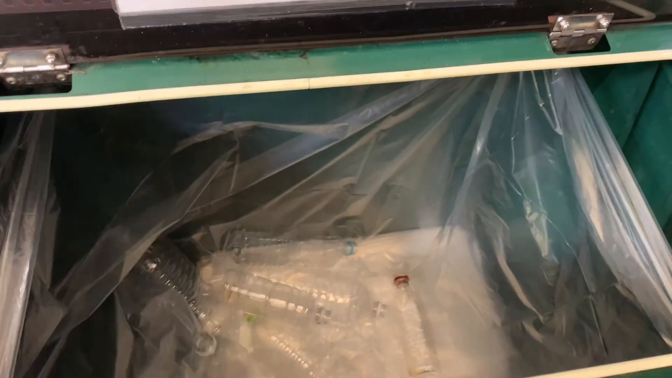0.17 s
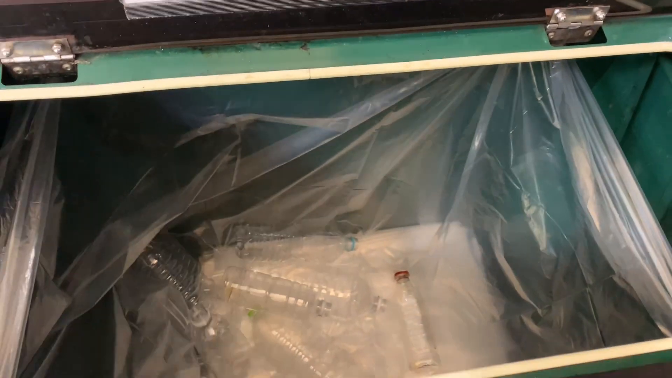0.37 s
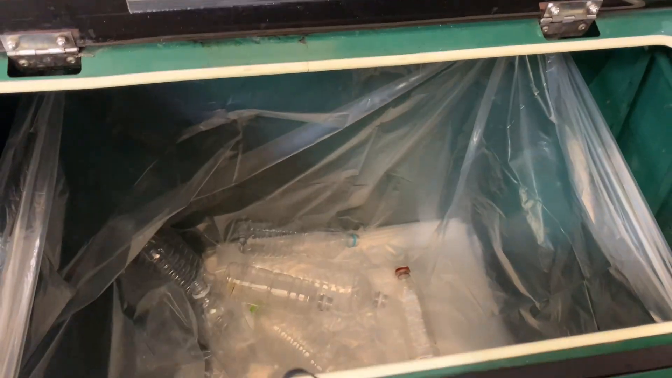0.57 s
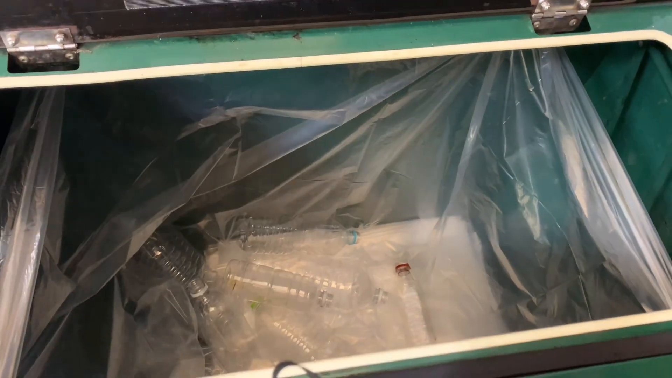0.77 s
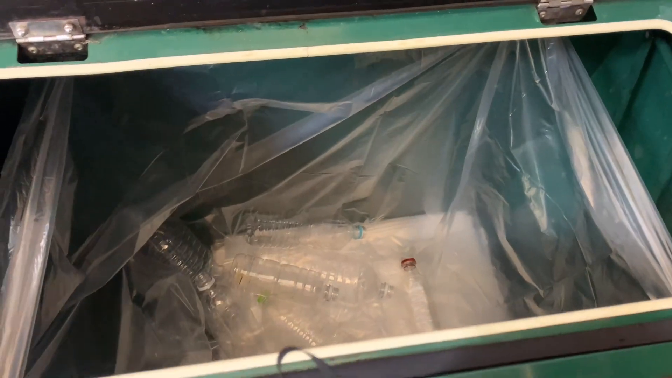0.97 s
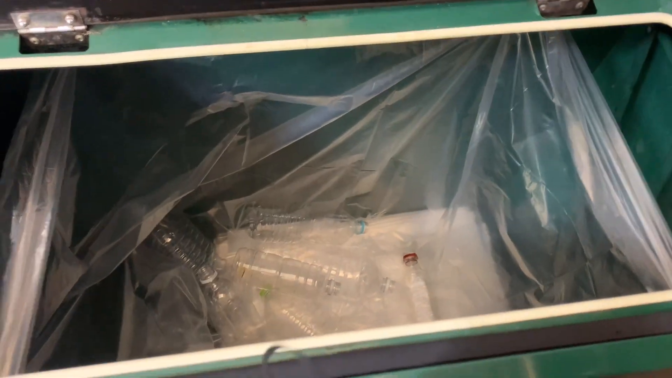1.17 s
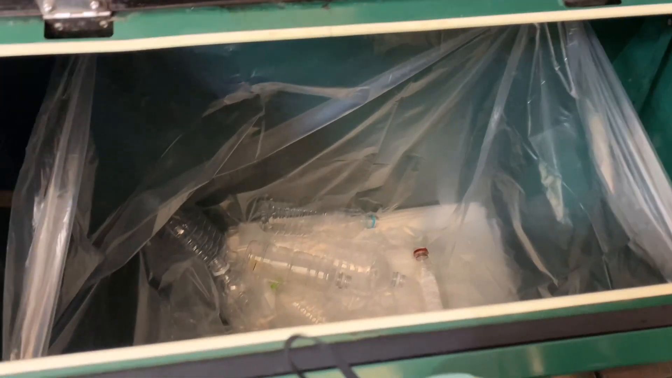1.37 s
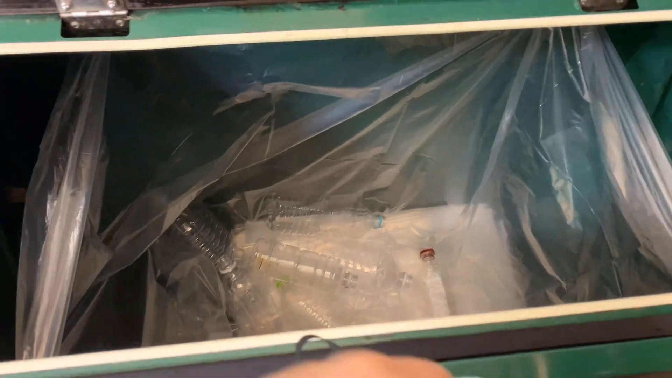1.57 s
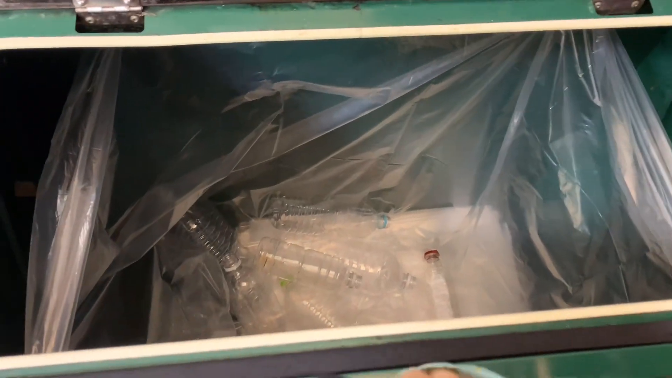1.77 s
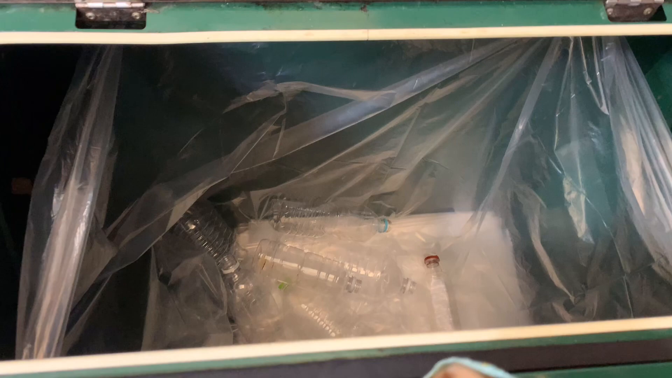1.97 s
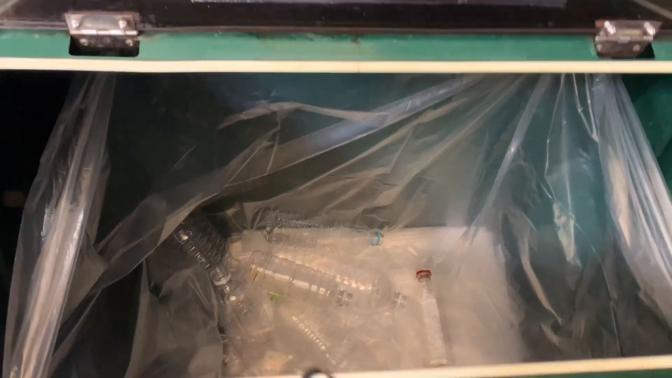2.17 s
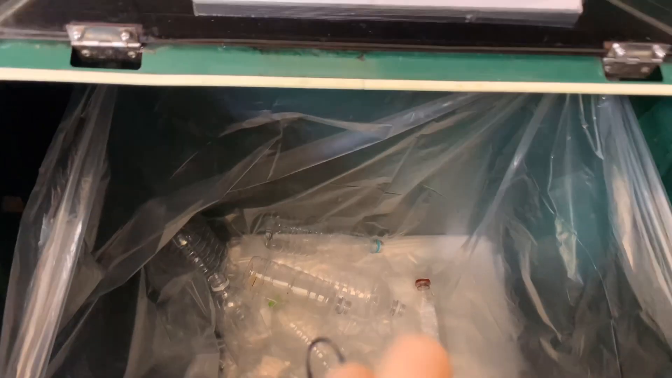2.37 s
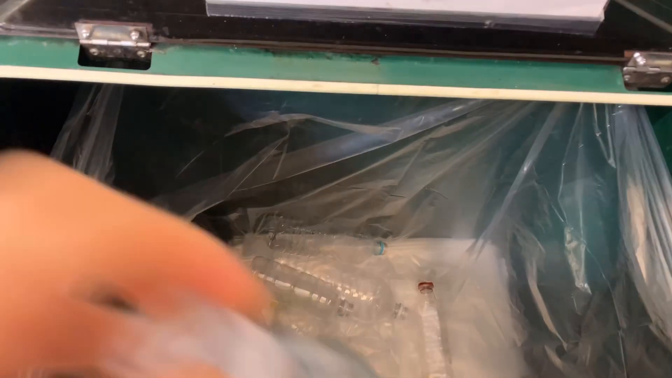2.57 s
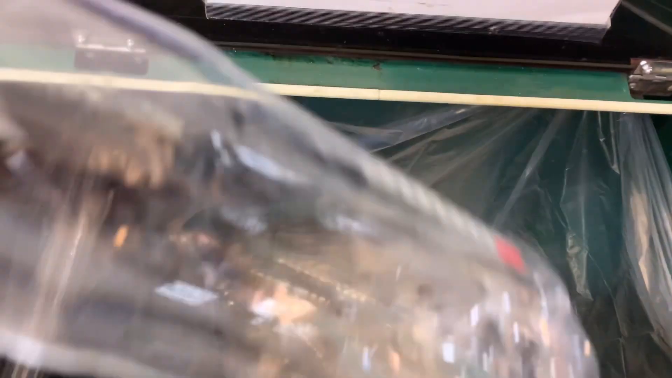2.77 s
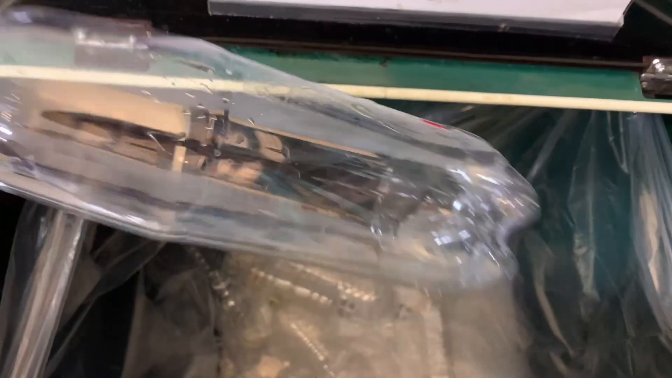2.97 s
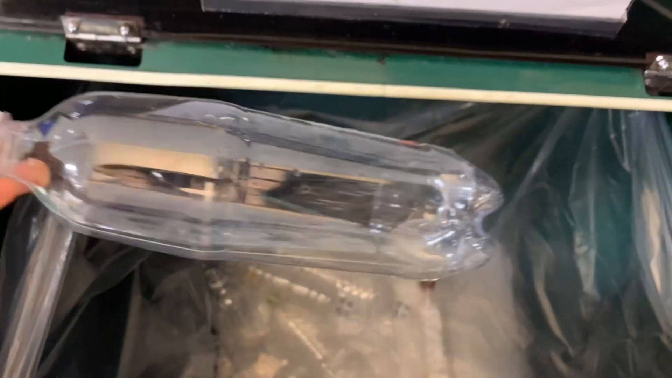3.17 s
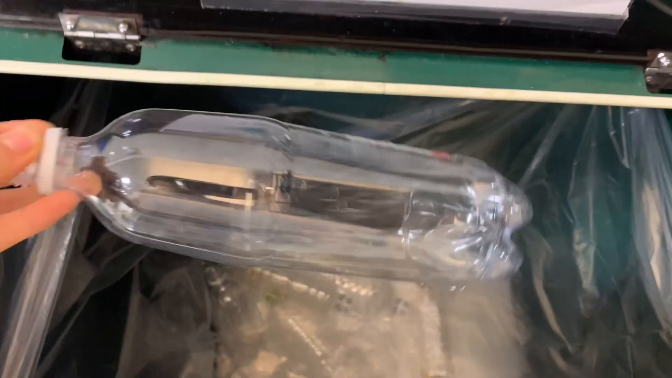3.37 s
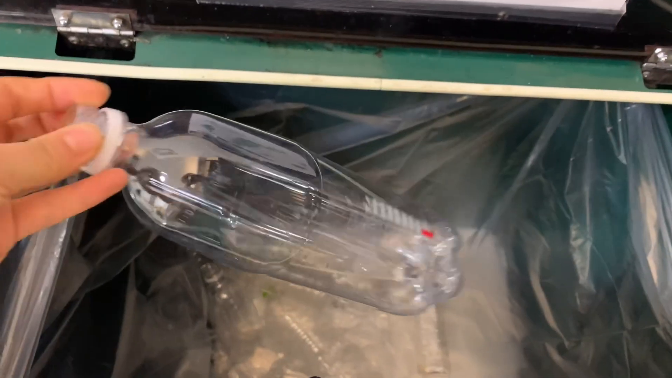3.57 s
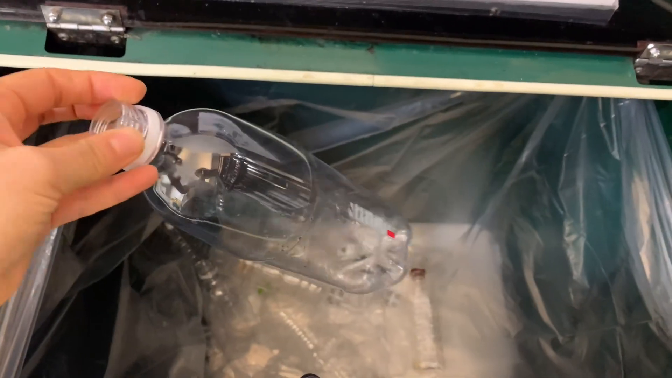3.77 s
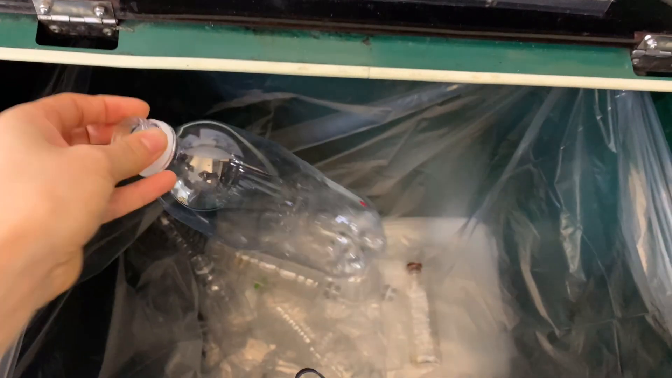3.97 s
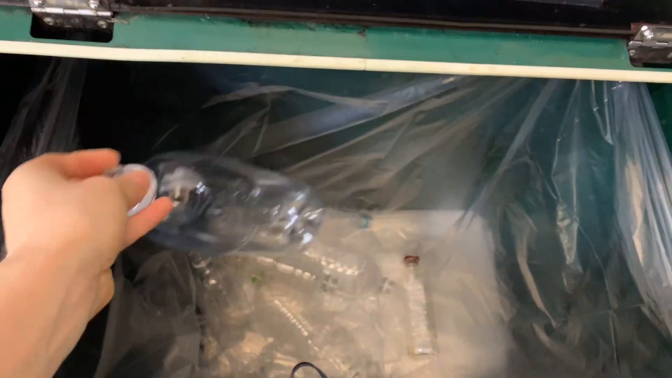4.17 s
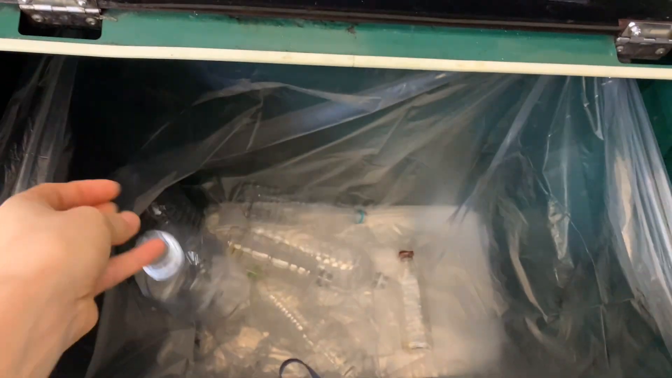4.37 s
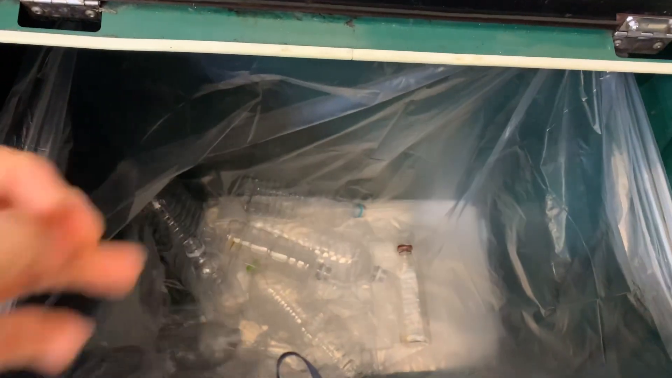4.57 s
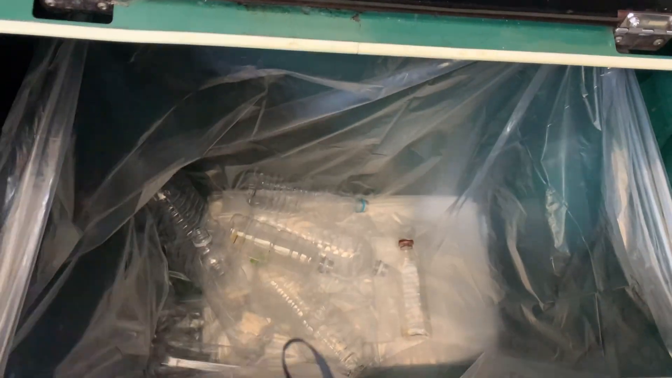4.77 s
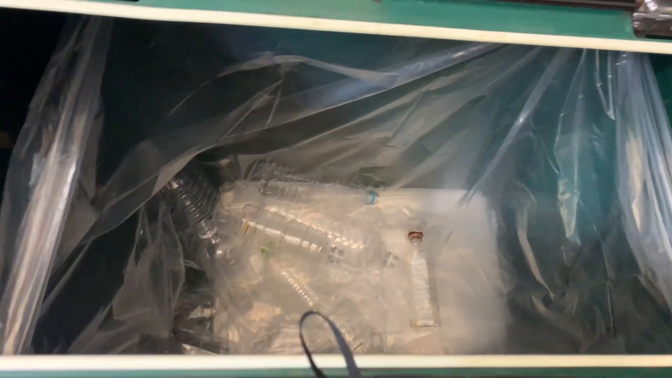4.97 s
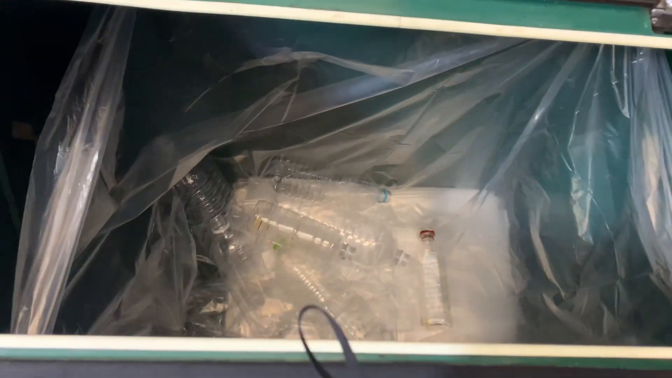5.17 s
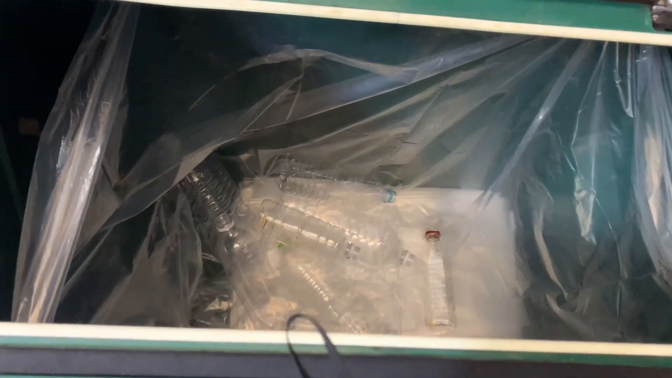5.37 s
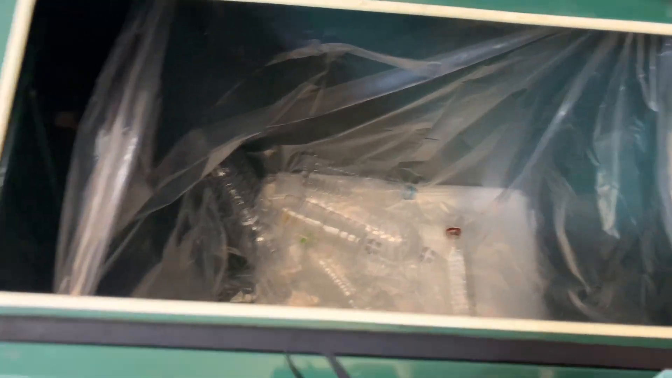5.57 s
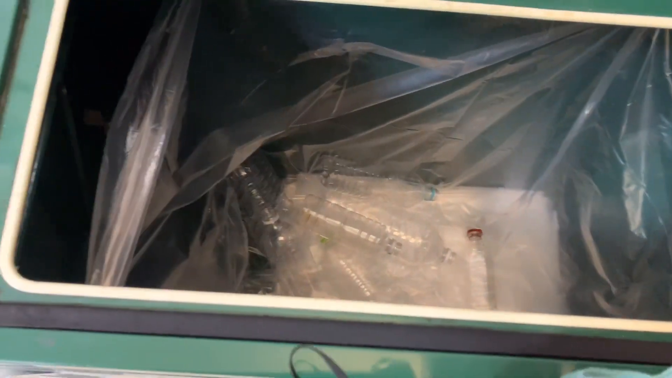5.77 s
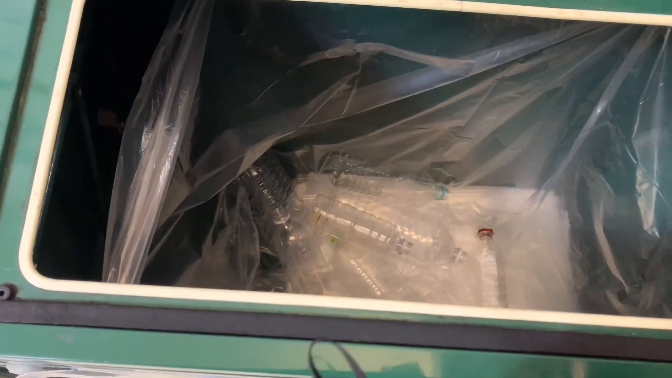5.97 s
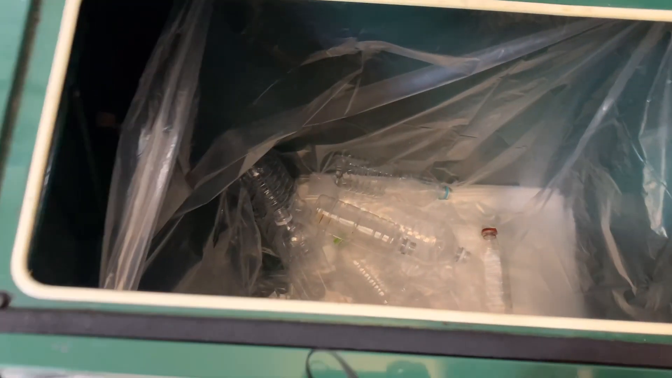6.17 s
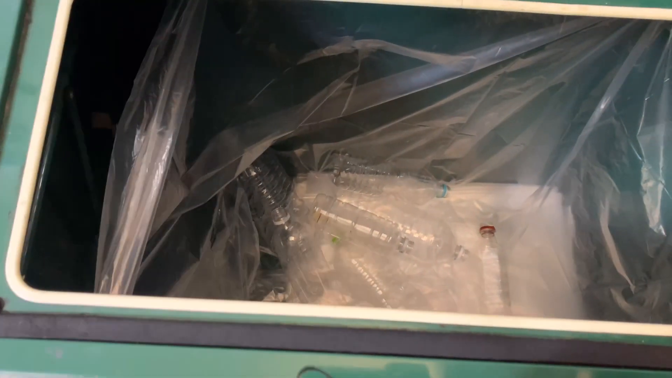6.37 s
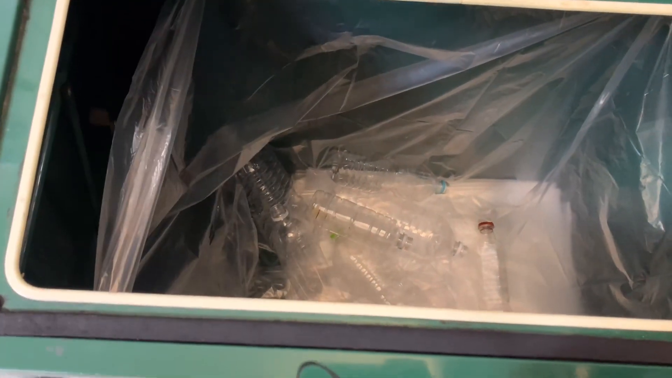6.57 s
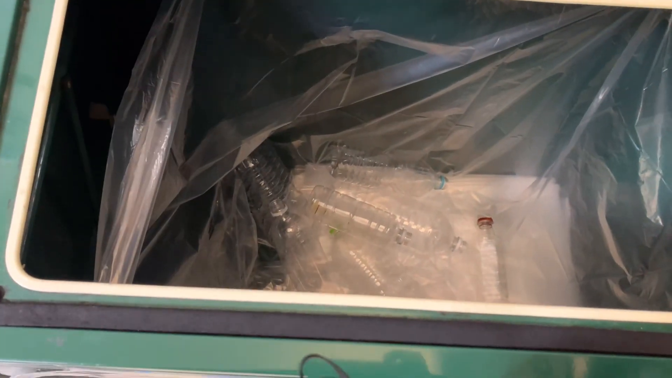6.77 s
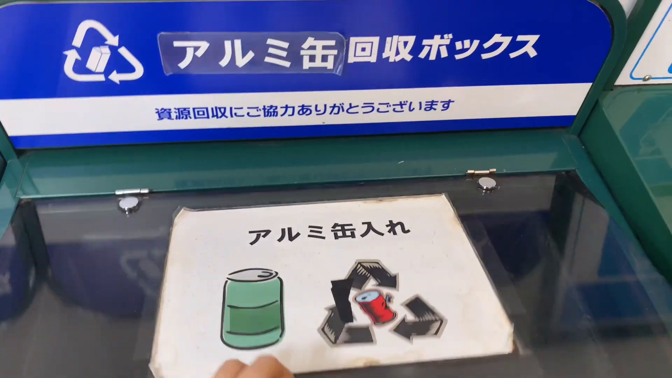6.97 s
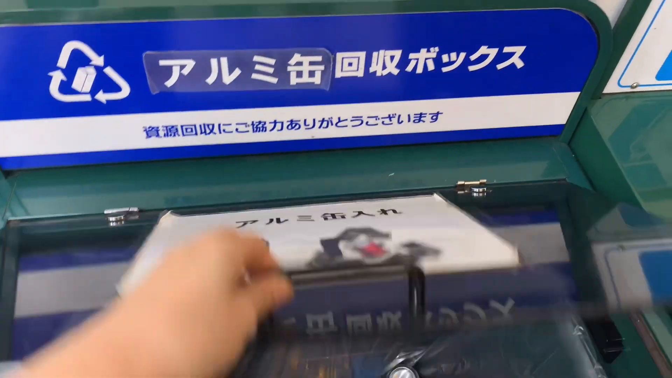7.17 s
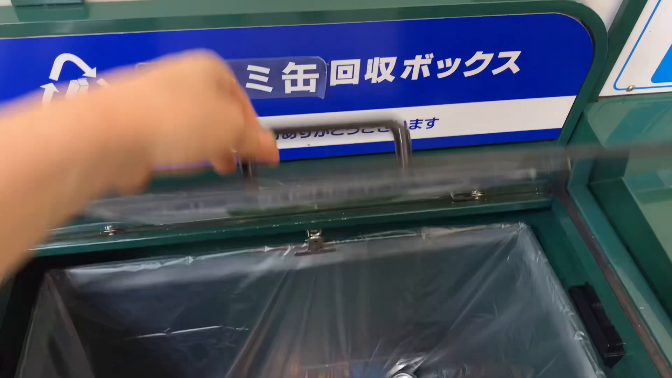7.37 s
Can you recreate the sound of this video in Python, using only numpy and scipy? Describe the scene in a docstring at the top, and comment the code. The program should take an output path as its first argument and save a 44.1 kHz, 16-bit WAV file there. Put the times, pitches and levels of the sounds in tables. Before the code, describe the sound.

Hollow plastic bottles drop and knock together in a recycling bin as its liner rustles and machinery hums softly.

```python
"""Empty plastic bottles drop into a bag-lined bin, over a low machine hum, heard in wide stereo.
0-1.2 s: a flurry of blows; each cracks a bottle's shell, rings it briefly and booms in the bin.
Plastic film rustles and crackles between the blows; faint tones come and go near 1.4 s.
2-2.7 s: lighter blows, then a lull with more faint tones.
From 4.5 s: hard blows at 4.6 and 6.1 s, each trailed by smaller ones; last crackles after 7 s."""
import sys
import numpy as np
from scipy import signal
from scipy.fft import rfft, irfft, next_fast_len
from scipy.io import wavfile
from scipy.ndimage import uniform_filter1d, map_coordinates

SR = 44100
rng = np.random.default_rng(int(sys.argv[2]) if len(sys.argv) > 2 else 0)


def transcribe(u):
    """Save the signal u as a 16-bit wav file named by the first command-line argument.

    u: samples, shape (n,) or (channels, n), limited to [-1, 1]; the rate is SR.
    q: integer samples, one column per channel.
    """
    v = np.clip(np.atleast_2d(u).T, -1, 1)
    q = np.round(v * 32767).astype(np.int16)
    wavfile.write(sys.argv[1], SR, q)


N = 327222

# low noise spectra of the machines and the bin's tail: (frequency [Hz], relative density [dB])
DRONE_SPECTRUM = [(100, -10), (150, 2), (190, 4.5), (240, -6.5), (310, -2.5), (500, -14.5), (900, -19.5),
                  (1400, -34), (1750, -29), (2300, -42.5), (4000, -37.5), (7000, -62), (16000, -90)]
RUMBLE_SPECTRUM = [(20, -55), (40, -0.5), (62, 8), (75, 0.5), (90, 13), (103, 5.5), (118, 12), (140, 3),
                   (170, -96)]


def amp(db):
    """dB to gain."""
    return 10 ** (np.asarray(db) / 20)


def unit(x):
    """Scale to rms 1."""
    return x / np.sqrt(np.mean(x ** 2) + 1e-20)


def along(points, hz):
    """Interpolate (frequency [Hz], value) points on a log axis."""
    knots_hz, values = np.transpose(points)
    return np.interp(np.log(hz + 1), np.log(knots_hz + 1), values)


def curves(rows):
    """Per-sample curve of each column after the time."""
    times_s, *columns = np.transpose(rows)
    return [np.interp(np.arange(N) / SR, times_s, column) for column in columns]


def wobble(rate_hz):
    """Smooth random curve, rate_hz knots a second."""
    knots = rng.standard_normal(int(N * rate_hz / SR) + 4)
    return map_coordinates(knots, [np.arange(N) * rate_hz / SR])


def phase_walk(step_rad, shape):
    """Random walk of phase, one step a sample."""
    return np.cumsum(step_rad * rng.standard_normal(shape), axis=-1)


def filtered(x, response):
    """Apply the frequency response response(hz)."""
    size = x.shape[-1]
    padded = next_fast_len(size + 4096)
    return irfft(rfft(x, padded) * response(np.fft.rfftfreq(padded, 1 / SR)), padded)[..., :size]


def coloured(x, spectrum):
    """Shape x by (frequency [Hz], gain [dB]) points; rms 1."""
    return unit(filtered(x, lambda hz: amp(along(spectrum, hz))))


def noise(spectrum, size, grain=1):
    """Two independent noises, roughened by grain, then coloured; rms 1."""
    return coloured(grain * rng.standard_normal((2, size)), spectrum)


def bursts(rows, rise_s):
    """Power envelope of decaying events (time [s], level [dB], t60 [s])."""
    power, t = np.zeros(N + SR), np.arange(SR) / SR
    for at_s, db, t60_s in rows:
        power[round(at_s * SR):][:SR] += amp(db - 60 * t / t60_s) ** 2 * (1 - np.exp(-t / rise_s))
    return power[:N]


def patchy(x, depth_db):
    """Random gain in patches of about 900 Hz by 30 ms; rms 1."""
    frames = signal.stft(x, nperseg=256)[2]
    patches = uniform_filter1d(rng.standard_normal(frames.shape[1:]), size=5, axis=0)
    patches = unit(uniform_filter1d(patches, size=10, axis=1))
    return unit(signal.istft(frames * amp(depth_db * patches), nperseg=256)[1][:, :N])


def machine_hum():
    """Distant machines drone and rumble, swelling a little."""
    # rumble: (time [s], level [dB])
    rumble_levels = [(0, -31.5), (.6, -33), (.75, -31.5), (1.1, -32), (1.5, -29), (2.1, -34), (2.7, -30),
                     (2.93, -35.5), (3.15, -28), (3.4, -34.5), (3.76, -33), (4.3, -32), (5.06, -30),
                     (5.5, -32), (5.95, -34.5), (6.2, -30), (6.8, -31), (7.42, -32.5)]
    rumble_db, = curves(rumble_levels)
    drone = amp(-34.5 + 0.12 * wobble(3.6)) * noise(DRONE_SPECTRUM, N)
    return drone + amp(rumble_db + 0.42 * wobble(5.9)) * noise(RUMBLE_SPECTRUM, N)


def faint_tones():
    """Unsteady tones swell and fade in the lulls."""
    # (centre [s], 1/e half width [s], pitch [Hz], peak [dB])
    swells = [(1.33, 0.042, 810, -46), (1.43, 0.12, 376, -36), (1.428, 0.15, 478, -37),
              (1.435, 0.05, 918, -42), (1.434, 0.075, 1090, -47.5), (3.127, 0.074, 1690, -55.5),
              (3.342, 0.17, 1676, -54.5), (3.97, 0.029, 1004, -44), (4.048, 0.03, 1724, -48.5),
              (4.06, .07, 1460, -58), (4.127, 0.056, 1010, -46)]
    out, t = np.zeros((2, N)), np.arange(-SR // 4, SR // 4) / SR
    for centre_s, half_s, hz, db in swells:
        tone = np.sin(2 * np.pi * hz * t + phase_walk(0.05, (2, len(t))))
        out[:, round((centre_s + t[0]) * SR):][:, :len(t)] += amp(db) * np.exp(-(t / half_s) ** 2) * tone
    return out


def crinkles(spectrum, low_hz, span, decay_cycles, count):
    """Small plastic panels buckle at random: damped sines from low_hz to span * low_hz; rms 1."""
    when, pitch, weakness, side = rng.random((count, 4)).T
    t = np.arange(450) / SR
    hz = (low_hz * span ** pitch)[:, None]
    envelope = np.exp(-t * hz / decay_cycles) * (1 - np.exp(-t / 0.00052))
    pings = amp(-3 * np.log(weakness + 0.073))[:, None] * envelope * np.sin(2 * np.pi * hz * t)
    row_size = N + len(t)
    starts = (when * N).astype(int) + (side > 0.5) * row_size
    indices = starts[:, None] + np.arange(len(t))
    pair = np.bincount(indices.ravel(), pings.ravel(), 2 * row_size).reshape(2, -1)
    return coloured(pair[:, :N], spectrum)


def plastic_film():
    """Creases slip in clumps: flickering hiss over resonant crinkles, with sudden crackles."""
    # slow handling: (time [s], hiss [dB], body [dB])
    rustle = [(0, -54, -46), (.11, -30.5, -28), (.17, -44.5, -31), (.24, -64, -38.5), (.4, -48.5, -43.5),
              (.58, -49.5, -38), (.69, -39, -44), (.71, -61, -46.5), (.87, -63, -47), (1.19, -45.5, -38),
              (1.26, -53.5, -44.5), (1.36, -75, -52), (1.5, -78, -51), (1.56, -48.5, -43.5),
              (1.81, -48.5, -47), (1.92, -33, -36.5), (1.96, -36, -43), (1.99, -37.5, -32.5),
              (2.04, -48.5, -38), (2.08, -36.5, -34), (2.2, -40, -40.5), (2.32, -35, -34),
              (2.42, -40.5, -35.5), (2.53, -32, -35.5), (2.62, -39, -36), (2.7, -39, -39),
              (2.88, -47.5, -46.5), (2.99, -40, -46.5), (3.1, -50, -45.5), (3.28, -57, -50),
              (3.42, -50.5, -46), (3.57, -60.5, -49), (4, -54.5, -48), (4.41, -58, -46.5),
              (4.47, -35.5, -43), (4.57, -30.5, -30), (4.67, -45.5, -38), (4.85, -43, -40.5),
              (4.95, -46, -42), (5.03, -43, -42.5), (5.14, -42, -41), (5.26, -38.5, -38.5),
              (5.31, -39, -34.5), (5.42, -35.5, -36.5), (5.47, -40.5, -37), (5.51, -36, -37),
              (5.6, -36, -34.5), (5.78, -39.5, -40.5), (5.84, -38.5, -42), (5.9, -41, -36),
              (5.94, -40.5, -37), (6.02, -39.5, -42), (6.1, -44.5, -44), (6.44, -54, -40),
              (6.68, -44.5, -38.5), (6.94, -51.5, -45), (7.42, -42, -39)]
    # sudden slips: (time [s], hiss [dB], t60 [s], fizz over hiss [dB])
    crackles = [(0.011, -32.5, 0.77, 0.5), (.28, -48, .5, 2), (0.435, -20.5, 0.11, -8),
                (.458, -33, .05, -13), (0.498, -36.5, 0.28, -4), (0.6235, -38, 0.059, 0),
                (0.757, -45.5, 0.058, -7), (0.88, -42, 0.6, -2), (0.991, -21, 0.1, -7),
                (1.045, -32, 0.11, -5), (1.057, -29, 0.13, -5), (1.089, -16.5, 0.06, -8.5),
                (1.285, -42.5, .06, -15), (1.485, -56.5, 0.39, -2), (1.537, -37, 0.032, -2),
                (1.694, -45, .04, 4), (1.853, -47, 0.032, 5), (1.88, -35.5, 0.22, 3),
                (2.109, -12.5, 0.072, -8.5), (2.229, -22, 0.022, -1.5), (2.275, -31, 0.098, -19),
                (2.446, -24, 0.04, -12), (2.657, -27, 0.17, -18), (3.958, -47, .06, 0), (4.435, -45, .2, 2),
                (4.45, -39, 0.2, -1), (4.472, -32.5, 0.18, 7), (4.546, -28.5, 0.27, 4),
                (4.783, -38, 0.066, 0), (5.105, -33, 0.035, -4), (5.213, -36, .04, -12),
                (5.313, -29.5, 0.055, -5), (5.4, -30, 0.13, -7), (5.487, -29.5, .04, -14),
                (5.825, -30, 0.071, -19), (5.912, -31.5, 0.1, -8), (6.0566, -17, 0.056, -10.5),
                (6.104, -36, .05, -4), (6.25, -45, 0.025, 7), (6.275, -36.5, 0.035, -10),
                (6.511, -39.5, 0.16, -5), (6.621, -32, 0.037, -9), (6.676, -34, 0.079, -4),
                (7.046, -33.5, 0.7, 4.5), (7.051, -33, 0.04, 12), (7.24, -30, 1, -1), (7.246, -34, 0.06, 9),
                (7.28, -35, 0.4, 0)]
    # mid, high and top bands: (frequency [Hz], relative density [dB])
    body_spectrum = [(200, -60), (450, 3), (800, 2.5), (1300, 3.5), (2000, 1), (3200, -3.5), (5000, -25.5)]
    hiss_spectrum = [(1500, -7), (3000, 1.5), (5000, 4.5), (7000, 3.5), (8500, -1.5), (11000, -54)]
    fizz_spectrum = [(7000, -10.5), (9000, -2.5), (11000, -2.5), (13000, -4.5), (15000, -8.5), (16000, -5)]
    hiss_db, body_db = curves(rustle)
    hiss_db += 0.44 * wobble(17)
    fizz_db = -46 + 1.17 * (hiss_db + 43)  # swings wider than the hiss
    crackle_power = bursts([row[:3] for row in crackles], rise_s=0.0035)
    fizz_power = bursts([(s, db + over_db, t60) for s, db, t60, over_db in crackles], rise_s=0.00058)
    grain = amp(0.44 * wobble(30) + 0.77 * wobble(110) + 0.76 * wobble(700))
    hiss = 0.69 * patchy(noise(hiss_spectrum, N, grain), depth_db=2.1)
    hiss += 0.28 * crinkles(hiss_spectrum, low_hz=2518, span=3.6, decay_cycles=23, count=4000)
    hiss += 0.15 * crinkles(hiss_spectrum, low_hz=2960, span=3.1, decay_cycles=0.82, count=1500)
    fizz = patchy(noise(fizz_spectrum, N, grain), depth_db=1.9)
    fizz += 0.22 * crinkles(fizz_spectrum, low_hz=7950, span=2, decay_cycles=6.2, count=1500)
    body = 0.45 * noise(body_spectrum, N, grain)
    body += 0.36 * crinkles(body_spectrum, low_hz=450, span=9, decay_cycles=14, count=4000)
    return (np.sqrt(amp(hiss_db) ** 2 + crackle_power) * hiss
            + np.sqrt(amp(fizz_db) ** 2 + fizz_power) * fizz
            + np.sqrt(amp(body_db) ** 2 + amp(-6.5) ** 2 * crackle_power) * body)


def bin_boom(t):
    """Thin bin walls: each mode's phase wanders, so the boom is lumpy."""
    # (frequency [Hz], relative level [dB], t60 [s])
    bin_modes = [(86.7, -10.5, 0.8), (155.4, -9.5, 0.31), (209.4, -5, 0.5), (234, -1.5, 0.11),
                 (246.6, 3.5, 0.1), (294.2, -6.5, 0.24), (310, -8, 0.27), (411.7, -6.5, 0.111),
                 (539, -11.5, 0.2)]
    hz, db, t60_s = np.transpose(bin_modes)[:, :, None]
    phase = phase_walk(0.0082, (len(hz), len(t)))
    # modes start nearly in phase in the shared field
    phase = phase + rng.uniform(0, 2 * np.pi, (2, len(hz), 1)) * [[[0.1]], [[1]]]
    envelope = amp(db + rng.normal(0, 1, db.shape) - 60 * t / t60_s)
    modes = envelope * np.sin(2 * np.pi * hz * t + phase)
    return modes.sum(axis=1) * (1 - np.exp(-t / 0.0015))


def shell_rattle(t):
    """Noise of the struck shell: a fast fall, then a weaker tail from the bin walls."""
    # (frequency [Hz], relative density [dB])
    rattle_spectrum = [(250, -4), (500, 22.5), (800, 16.5), (1300, 14), (2000, -3.5), (3000, -3.5),
                       (4500, -12), (7000, -53)]
    return noise(rattle_spectrum, len(t)) * (amp(-60 * t / 0.11) + 0.067 * amp(-60 * t))


def shell_modes(t):
    """Bottle modes ring at a new tuning and strength on each blow."""
    # (frequency [Hz], relative level [dB], t60 [s])
    bottle_modes = [(351, -1, 0.3), (475, -4.5, 0.18), (682, -20, 0.092), (929, -12, 0.17),
                    (1154, -1.5, 0.1), (1350, -20, 0.15), (1410, -13, 0.098), (1610, -10, 0.082),
                    (1722, -17.5, 0.2), (1994, -9, 0.11), (2196, -16.5, 0.11), (2450, -10, 0.061),
                    (2680, -13, 0.091), (3050, -21, 0.097)]
    hz, db, t60_s = np.transpose(bottle_modes)[:, :, None]
    hz = hz * rng.normal(1, 0.016, hz.shape)
    modes = amp(db - 60 * t / t60_s) * np.sin(2 * np.pi * hz * t + rng.uniform(0, 2 * np.pi, hz.shape))
    scatter_db = 6.5 * rng.standard_normal((2, len(hz)))
    return amp(scatter_db) @ modes


def shell_snap(t):
    """The shell cracks: a bright click with a short tail."""
    # (frequency [Hz], relative density [dB])
    snap_spectrum = [(700, -18), (1500, -12.5), (2600, -1), (3600, -5), (5000, 5), (8000, -7), (12000, -13),
                     (16000, -28)]
    return noise(snap_spectrum, len(t)) * (amp(-60 * t / 0.0043) + 0.052 * amp(-60 * t / 0.03))


def bottle_blows():
    """Each blow snaps, rattles and rings the shell, booms the bin and leaves low noise in it."""
    # (time [s], shell [dB], pitch 1 [Hz], over shell [dB], pitch 2 [Hz], over shell [dB],
    #  boom [dB], snap [dB], ring t60 [s])
    blows = [(0.0218, -32, 1373, 6, 2040, 8, -52, -28, 0.055),
             (0.082, -16, 920, 6, 1240, -2, -19, -29, .03),
             (0.0902, -4, 1130, 7, 1827, 9.5, -4, -25, 0.017),
             (0.092, -14, 2440, 2, 3470, -2, -32, -20, 0.022), (0.1, -21, 950, 2, 2290, -1, -30, -33, .05),
             (0.112, -20.5, 900, 8.5, 1160, -6, -26, -45, 0.083),
             (0.1288, -17, 512, -4, 1410, -6, -18, -47, 0.089),
             (0.15, -27, 973, 4, 2050, -10, -24, -50, 0.34),
             (0.167, -39, 880, -1.5, 1730, -14, -10, -46, 0.12),
             (0.2871, -32, 520, -5, 1940, -6, -12, -42, 0.061),
             (0.303, -34, 460, 5, 1220, 1, -18, -47, .07), (0.39, -40, 530, 6, 1100, 3, -25, -50, 0.077),
             (0.4387, -18, 1316, -3, 3320, -15.5, -16.5, -15, .13),
             (0.523, -43, 1420, -4, 3220, 12, -41, -48, 0.056),
             (0.623, -22.5, 577, -0.5, 1717, -9, -46, -35, 0.19),
             (0.6497, -28.5, 1115, -2, 1445, -8, -35.5, -46, 0.22),
             (0.669, -30, 1130, -4, 3150, -5, -36.5, -39, 0.07),
             (0.882, -32.5, 1300, 7, 3120, 1, -53, -34, 0.07),
             (0.89, -29, 1233, 2.5, 1460, -7, -51, -30, 0.12),
             (0.924, -30.5, 1192, -1, 1400, -6, -47, -48, .15),
             (0.94, -29, 1184, 3, 1520, -14, -40, -36, 0.14),
             (0.9671, -26, 860, 0, 1580, -14, -44, -32, 0.11),
             (0.9943, -17, 1230, -12, 2230, 5, -35, -14, 0.072),
             (1.048, -26.5, 1420, -2, 1740, -1, -28.5, -43, 0.041),
             (1.09, -15, 632, 5, 1634, -0.5, -34, -11, 0.041),
             (1.094, -25, 1220, 2, 4180, 2, -47, -26, 0.044),
             (1.1323, -26, 645, 8.5, 1420, -5, -32, -38, 0.061),
             (1.199, -35, 501, 8, 1350, -4, -35, -36, 0.32),
             (1.974, -30.5, 586, 13, 1200, -13, -45, -40, 0.071),
             (1.985, -32, 1260, 1.5, 1610, -5, -44, -33, 0.17),
             (2.092, -29, 860, 0, 1270, -5, -49, -50, 0.08),
             (2.1088, -34, 1240, -8, 2210, 11, -32, -22, 0.1),
             (2.229, -32, 1063, 3, 3260, -4, -57, -22, 0.08),
             (2.249, -39, 1050, 3, 1290, -6, -52, -50, 0.068),
             (2.312, -32, 473, 8, 2030, -7, -51, -45, 0.11),
             (2.372, -38.5, 726, 8.5, 1260, -6, -57, -50, 0.29),
             (2.393, -28, 1205, 1, 1530, -9, -46, -47, 0.067),
             (2.439, -36, 1133, 4.5, 1690, -1, -43, -52, 0.18),
             (2.527, -26, 586, -3.5, 2110, -11, -32.5, -40, 0.2),
             (2.609, -39, 900, 7, 1550, 1, -50, -50, 0.12),
             (2.6588, -22.5, 1100, -1, 1814, -5, -33.5, -31, 0.11),
             (4.473, -37.5, 1443, -3, 1980, 1, -47, -34, 0.16),
             (4.5734, -5.5, 510, 2, 1788, 10, -5.5, -14.5, 0.024),
             (4.5656, -16, 1500, 0, 2280, 0, -28, -25, 0.033),
             (4.578, -17.5, 520, 4, 2480, -7, -12, -30, 0.086),
             (4.589, -19.5, 918, -3, 1770, -5, -19, -45, 0.2),
             (4.6085, -19.5, 490, 5, 1365, -6, -28, -35, 0.11),
             (4.639, -23, 535, -8, 970, 0, -17, -42, 0.18),
             (4.6843, -28.5, 500, 2, 1360, -4, -16.5, -50, 0.079),
             (4.7795, -38.5, 487, 6.5, 1720, -5, -24, -38, 0.21),
             (5.0232, -28, 1255, -3, 1720, -12, -33.5, -39, 0.075),
             (5.214, -32, 860, 3, 1480, -1, -46, -45, .059),
             (5.334, -24.5, 1354, -1.5, 2004, 1.5, -36.5, -29, 0.061),
             (5.4066, -29.5, 567, 0, 3240, 1, -40, -40, 0.13),
             (5.629, -39, 1000, 6.5, 1580, -4.5, -46, -45, 0.15),
             (5.654, -32, 960, 1, 1480, 2, -44, -42, 0.063), (6.046, -28, 960, 0, 1500, 0, -50, -30, .05),
             (6.0573, -10, 942, 2.5, 1556, -0.5, -44, -24, 0.039),
             (6.0587, -17.5, 2630, 1, 3350, -6, -52, -20, 0.035),
             (6.2754, -22, 700, 10.5, 1890, -4, -30.5, -35, 0.039),
             (6.296, -28.5, 1323, -1, 490, -1, -36, -53, .08),
             (6.3189, -23, 286, 6.5, 466, 7, -22.5, -51, 0.074),
             (6.336, -29.5, 1120, 2.5, 1460, -1, -29, -50, 0.1),
             (6.362, -31, 748, 4.5, 508, -1, -39, -52, 0.21),
             (6.401, -34, 1000, 4, 1490, -7, -37, -52, .08),
             (6.5135, -26.5, 490, 1, 1630, -6, -38, -27.5, 0.051),
             (6.5335, -25.5, 1310, -4.5, 1084, -5, -28, -52, 0.27),
             (6.664, -33, 558, -3, 1510, 3, -50, -45, 0.073),
             (6.671, -27.5, 537, 5, 1193, -9, -42, -35, 0.081),
             (7.052, -35.5, 1400, 1, 2600, -7, -56, -36, 0.26),
             (7.2451, -31, 1225, -12, 3086, -34, -32, -39, .068)]
    out, t = np.zeros((2, N + SR)), np.arange(SR // 4) / SR
    attack = 1 - np.exp(-t / 0.003)
    tail_t60_s, tails = 1.18, []
    for at_s, shell_db, first_hz, first_db, second_hz, second_db, boom_db, snap_db, ring_t60_s in blows:
        phase = phase_walk(0.07, (2, 1, len(t))) + rng.uniform(0, 2 * np.pi, (2, 2, 1))
        ring = amp(first_db) * np.sin(2 * np.pi * first_hz * t + phase[0])
        ring += amp(second_db) * np.sin(2 * np.pi * second_hz * t + phase[1])
        ring *= amp(-60 * t / ring_t60_s)
        shell = amp(shell_db) * (ring + amp(-8.5) * shell_rattle(t) + amp(-11) * shell_modes(t))
        snap = amp(snap_db) * shell_snap(t)
        boom = amp(boom_db) * bin_boom(t)
        out[:, round(at_s * SR):][:, :len(t)] += attack * (shell + boom) + snap
        tails.append((at_s, boom_db - 16.5, tail_t60_s))
    tail_gain = np.sqrt(bursts(tails, rise_s=0.043))
    return out[:, :N] + tail_gain * (noise(DRONE_SPECTRUM, N) + noise(RUMBLE_SPECTRUM, N))


def scene():
    """Two sound fields: one shared by the microphone ports, one that differs between them."""
    return bottle_blows() + plastic_film() + machine_hum() + faint_tones()


def record(dry):
    """A phone mixes its ports to wide stereo; peaks saturate; the band is limited."""
    # channel likeness: (frequency [Hz], coherence [0-1])
    coherence = [(60, 0.96), (170, 0.97), (260, 0.077), (400, 0.83), (700, 1), (1300, 0.6), (1800, 0.49),
                 (3000, 0.7), (4500, 1), (16000, 1)]
    # port balance: (frequency [Hz], left over right [dB])
    balance = [(30, -5), (90, -7), (200, -16.5), (330, -8.5), (450, 0.5), (700, -0.5), (16000, 0)]
    # port phase besides the lag: (frequency [Hz], right lead [rad])
    right_lead = [(60, .25), (220, .2), (340, -1.8), (520, -1.6), (860, -1.1), (1050, -.4), (1400, 1.5),
                  (1750, 1.9), (2250, 1.7), (2750, 2.4), (3450, 3.7), (4200, 3.98), (16000, 3.98)]
    right_lag_s, low_cut_hz, top_hz, ceiling = 239e-6, 45, 16000, 0.95

    def mid_side(hz):
        angle = np.arccos(np.clip(along(coherence, hz), 0, 1)) / 2
        return np.array([np.cos(angle), np.sin(angle)])

    def ports(hz):
        half_turn = np.exp(0.5j * (along(right_lead, hz) - 2 * np.pi * hz * right_lag_s))
        low_cut = hz ** 2 / (hz ** 2 + low_cut_hz ** 2)
        return np.array([amp(along(balance, hz)) / half_turn, half_turn]) * low_cut

    mid, side = filtered(dry, mid_side)
    stereo = filtered(np.array([mid + side, mid - side]), ports)
    saturated = stereo / (1 + np.abs(stereo / ceiling) ** 8) ** (1 / 8)
    return filtered(saturated, lambda hz: hz < top_hz)


dry = scene()
out = record(dry)
transcribe(out)
```